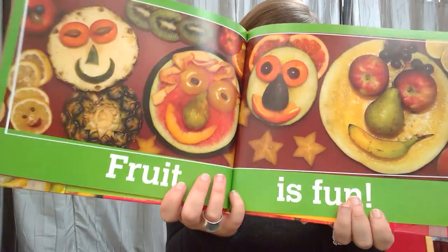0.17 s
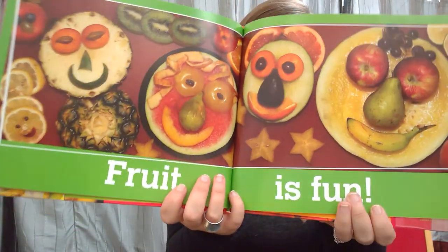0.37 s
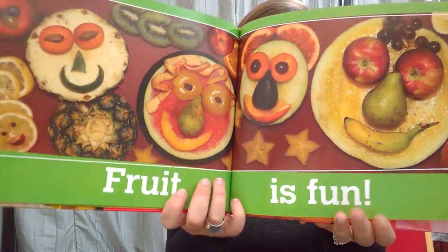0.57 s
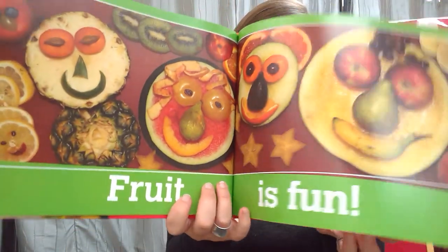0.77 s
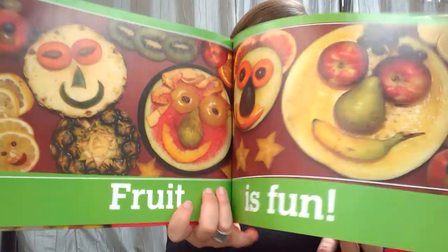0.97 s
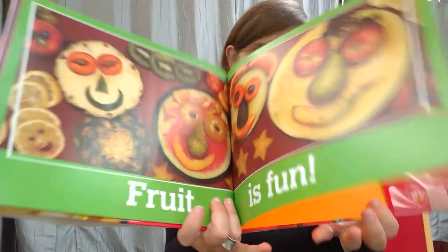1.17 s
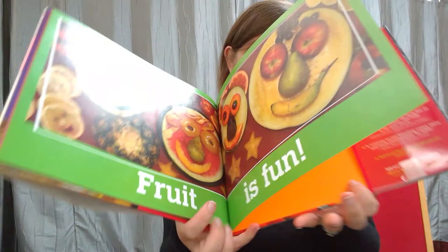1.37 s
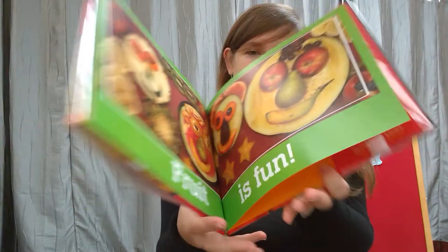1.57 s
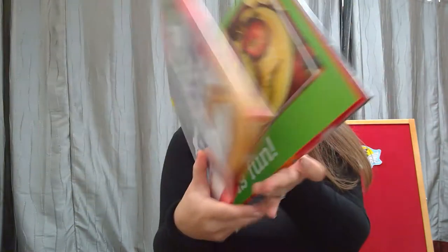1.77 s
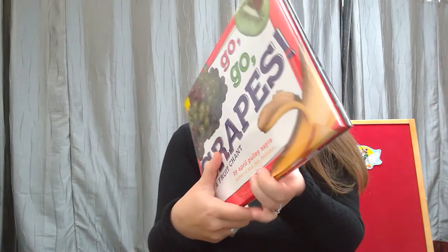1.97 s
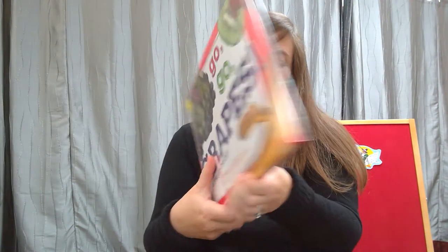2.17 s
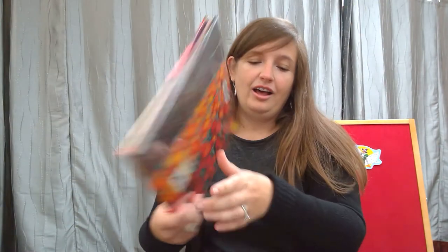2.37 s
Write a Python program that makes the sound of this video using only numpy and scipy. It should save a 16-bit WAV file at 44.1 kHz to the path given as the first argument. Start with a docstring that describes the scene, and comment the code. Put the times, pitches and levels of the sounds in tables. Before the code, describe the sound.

Hands shift and close a big stiff-covered book, with dull knocks and brief paper slides giving way to sharp, light clicks and crinkles, close and slightly left, over faint low room rumble and hum.

```python
"""In a small quiet room, a large hardcover picture book is held open, folded shut and turned over close by.
Fingers tap and slide on the boards, and the spine and glossy jacket snap and crackle: short bursts and
rushes of noise make the cover ring. Soft knocks are fading tones with a dull scuff.
A palm drags with a thin, sinking whistle, and the pages flap low: both are shaped noise.
Under it lie a low room rumble of noise and a faint steady hum; near echoes and a short tail add the room."""
import sys
import numpy as np
from scipy import signal
from scipy.fft import rfft, irfft
from scipy.io import wavfile
from scipy.ndimage import uniform_filter1d

SR = 44100
rng = np.random.default_rng(int(sys.argv[2]) if len(sys.argv) > 2 else 0)


def transcribe(signal):
    """Save signal, clipped to [-1, 1], as a 16-bit WAV file at the path in sys.argv[1]."""
    frames = np.atleast_2d(signal).T
    limited = np.clip(frames, -1, 1)
    pcm = np.round(limited * 32767).astype(np.int16)
    wavfile.write(sys.argv[1], SR, pcm)


N = 106501  # length in samples

# In all tables, t60_s is the time a sound takes to fade by 60 dB.
# Room rumble, tone balance: pitch_hz, relative_level_db (per Hz)
RUMBLE_SPECTRUM = [(25, -5), (37, 8), (47, -12), (58, -9.5), (80, -22.5), (170, -33.5), (500, -36),
                   (1200, -43), (3000, -57), (6000, -54), (16000, -65)]
# Steady hum: pitch_hz, level_db
HUM_TONES = [(120.5, -71)]
# Fading tail of the room: pitch_hz, t60_s, level_db
ROOM_TAIL = [(149, 0.086, -7.5), (463, 0.42, -4.5), (1110, 0.21, -9.5), (2780, 0.17, -13),
             (6550, 0.33, -13), (17700, 0.31, -23.5)]
# Echoes from nearby surfaces: delay_s (varied by up to a tenth), level_db
NEAR_ECHOES = [(.0031, -17), (0.0116, -16)]
# Loudness of the flapping pages as the book moves: time_s, level_db
FLAP_LEVEL = [(0, -50.5), (.35, -69.5), (.46, -58), (.7, -45), (.88, -55.5), (1.0, -46), (1.1, -56),
              (1.28, -59), (1.37, -52), (1.55, -60), (2.0, -58), (2.15, -60.5), (2.41, -63.5)]
# Flapping pages, tone balance: pitch_hz, relative_level_db (per Hz)
FLAP_SPECTRUM = [(15, -17.5), (35, 9.5), (70, 1.5), (130, -12.5), (300, -12), (600, -17.5), (1200, -30),
                 (4000, -54.5)]
# Loudness of the fine crackle as the jacket flexes: time_s, level_db
CRACKLE_LEVEL = [(.4, -82), (.7, -86), (.87, -70), (1.27, -77), (1.36, -53), (1.55, -65), (1.7, -58.5),
                 (1.85, -64), (2.02, -55), (2.16, -75), (2.26, -56), (2.41, -53)]
# Fine crackle, tone balance: pitch_hz, relative_level_db (per Hz)
CRACKLE_SPECTRUM = [(100, -54), (500, -1), (1000, -7.5), (1900, 14.5), (4000, 5.5), (8000, -17.5),
                    (16000, -11)]
# Ringing of the cover, before each contact shifts its pitch: pitch_hz, level_db, t60_s
COVER_MODES = [(968, -27.5, 0.024), (1870, -27, 0.0072), (2246, -25, 0.019), (3260, -11, 0.0039),
               (4240, -24.5, 0.02)]
# Board, crack, snap and fizz bands, one per row: low_hz, high_hz
BAND_EDGES = [(500, 1400), (1400, 2800), (2800, 6000), (6000, 16000)]
# The same four bands: click_decay_s, left_right_likeness (0 to 1), right_channel_db (against the left)
BAND_CHARACTER = [(0.0034, 0.66, -4), (0.0023, 0, -13), (0.00079, 0.56, -7.5), (0.0018, 0, -12)]
# Soft blows on the boards, pitched by the grip: start_s, pitch_hz, level_db, t60_s
BOARD_KNOCKS = [(0.4287, 347, -30, 0.027), (.9345, 825, -29, 0.016), (.9565, 724, -34.5, 0.043),
                (0.977, 745, -34, 0.06), (1.1, 658, -49, 0.059), (1.3443, 166, -30, 0.058),
                (1.3499, 245, -32.5, 0.036), (1.4048, 420, -30.5, 0.026), (1.6409, 819, -38, 0.1),
                (1.766, 350, -37, 0.046), (1.965, 282, -39, 0.062), (1.989, 167, -42.5, 0.089),
                (2.302, 385, -38, 0.044)]
# Short rushes of noise, from skin and paper sliding and from the fading tails of snaps:
# start_s, length_s, board_db, crack_db, snap_db, fizz_db
RUSHES = [(0, 0.021, -50, -51, -46.5, -51.5), (0.275, 0.053, -74, -64, -102, -83),
          (0.421, 0.024, -42, -54, -69.5, -58.5), (0.651, 0.096, -54.5, -66, -81, -97),
          (0.681, 0.046, -55, -54.5, -61, -62), (0.93, 0.028, -44, -44.5, -56, -54),
          (0.959, 0.026, -46, -51.5, -58.5, -60), (1.324, 0.071, -54.5, -54.5, -57.5, -51),
          (1.633, 0.011, -40, -51, -71, -44), (1.96, 0.051, -55.5, -50.5, -54, -59),
          (2.029, 0.053, -86, -53, -63.5, -59), (2.191, 0.078, -98, -92, -55, -54.5)]
# Snaps of spine, jacket and fingertips: time_s, board_db, crack_db, snap_db, fizz_db
SNAPS = [(0.0547, -37.5, -48, -87, -98), (0.073, -51, -50.5, -90, -93), (0.3509, -75, -63, -61.5, -91.5),
         (0.4312, -42.5, -42, -46.5, -83), (0.4332, -46, -52, -53, -90), (0.4498, -62, -50, -51, -77),
         (0.517, -56, -55.5, -65.5, -90), (0.544, -38, -45, -54, -89), (0.6127, -32.5, -32, -46, -39.5),
         (0.6381, -39, -45.5, -52.5, -58.5), (0.7191, -50.5, -75, -44.5, -61.5),
         (0.793, -77, -67, -62, -54), (0.8253, -63.5, -55.5, -67, -103), (0.9009, -47, -58, -78, -93),
         (0.9403, -45.5, -47.5, -49, -49), (0.9694, -45.5, -42, -54, -63.5), (0.9752, -46, -48, -45.5, -61),
         (0.9843, -53, -40, -51, -70), (1.0794, -63, -77, -57.5, -64.5), (1.137, -66, -55, -53, -80),
         (1.2019, -43.5, -48.5, -58, -87), (1.2111, -46.5, -49.5, -81, -82), (1.297, -66, -87, -60.5, -57),
         (1.337, -58, -48, -47, -49.5), (1.3474, -41.5, -44.5, -39.5, -38.5),
         (1.3539, -46, -67, -48.5, -43), (1.4028, -41, -65, -55, -50.5), (1.441, -42, -36, -34.5, -36),
         (1.5103, -64, -48.5, -51.5, -62.5), (1.561, -68, -49, -58, -57.5), (1.5716, -61, -61, -69, -51),
         (1.598, -70, -54.5, -58, -44), (1.6363, -61, -41.5, -48.5, -49),
         (1.6572, -72, -40.5, -51.5, -82.5), (1.6743, -51, -50, -44, -47), (1.748, -57, -43.5, -54, -64),
         (1.774, -57, -47.5, -44.5, -41), (1.795, -79, -51, -52, -52.5), (1.819, -75, -52, -56, -56),
         (1.874, -61.5, -46, -50, -76.5), (1.9066, -86, -36.5, -48, -45), (1.931, -78, -51, -70, -47.5),
         (1.9949, -41, -55, -39.5, -47.5), (1.998, -76, -34, -37, -37.5), (2.0372, -67, -51, -52, -87),
         (2.0539, -51.5, -63, -47, -54), (2.075, -54, -52, -45, -47.5), (2.1369, -79, -82, -51, -57.5),
         (2.1979, -72, -48.5, -34, -44.5), (2.3022, -86, -73, -49.5, -52.5),
         (2.3324, -64, -49, -56.5, -76.5), (2.3643, -61, -44.5, -44.5, -51.5)]

RUMBLE_DB, RUMBLE_LIKENESS = -57.5, 0.99
ROOM_RIGHT_DB, ROOM_ONSET_S = -2.5, 0.00067
ROOM_MONO_HZ = 1420  # the two sides of the tail grow less alike towards and above this pitch
FLAP_RIGHT_DB = -2.76
DRAG_START_S, DRAG_FROM_HZ, DRAG_TO_HZ, DRAG_WIDTH_HZ = 2.22, 2140, 1700, 170
DRAG_DB = -56  # before the stroke shapes it
CRACKLES_PER_S, CRACKLE_SPREAD_DB = 3500, 2.5
JACKET_RIGHT_DB = -8.5  # for the crackle and the drag
CLUMP_S, CLUMP_DB = 0.004, 4  # grains come in clumps
GRIP_DETUNE = 0.099  # share of pitch by which the hands shift the cover's modes
KNOCK_RISE_S, KNOCK_RIGHT_DB = 0.0025, -4.5
KNOCK_SCUFF = 0.45  # strength of the scuff (rms) beside a tone of peak 1
RUSH_ATTACK_S, RUSH_RELEASE_S, RUSH_TOP_HZ = 0.0075, 0.019, 9140
GRAINS_PER_S, GRAIN_SPREAD_DB = 920, 3.5
RUSH_SMOOTH = 0.46  # smooth hiss beside the grains
SHARP_RISE_S = 0.00016
SOFT_EXTRA_RISE_S, SOFT_RANGE_DB = 0.0011, 20  # dull fingertip taps build up more slowly than snaps
FIRST_SNAP = 0.57  # strength of the first impulse in a sharp snap
LEAD_IN_S, LEAD_IN_DB = 0.0035, -14.5  # the surfaces creep softly around the moment they let go, fading away before and after it
RIGHT_LAG_S = 0.00008
TOP_HZ = 15900


def amp(db):
    """Turns decibels into a multiplier."""
    return 10 ** (np.asarray(db) / 20)


def unit(x):
    """Scales a sound to an average (rms) strength of 1."""
    return x / np.sqrt(np.mean(x ** 2) + 1e-20)


def read(points, hz, axis=1):
    """Reads a table column between its points, with pitch spaced on a log scale."""
    table = np.transpose(points)
    return np.interp(np.log(hz + 1), np.log(table[0] + 1), table[axis])


def level(points):
    """Makes a multiplier that changes over time from (time_s, level_db) points."""
    return amp(np.interp(np.arange(N) / SR, *np.transpose(points)))


def add(mix, s, sound):
    """Mixes a stereo sound in at time s."""
    start = max(round(s * SR), 0)
    part = mix[:, start:][:, :sound.shape[1]]
    part += sound[:, :part.shape[1]]


def colour(x, points):
    """Gives a sound the listed tone balance without smearing it ahead in time; the result has rms 1."""
    log_gain = np.log(amp(read(points, abs(np.fft.fftfreq(N, 1 / SR)))))
    # the Hilbert transform supplies the phase that keeps the filter from acting early
    response = np.exp(np.conj(signal.hilbert(log_gain)))[:N // 2 + 1]
    return unit(irfft(rfft(x) * response, N))


def pair(a, b, likeness):
    """Blends two unrelated sounds into two channels that are alike by a chosen amount."""
    c = np.clip(likeness, 0, 1)
    right = c * unit(a) + np.sqrt(1 - c * c) * unit(b)
    return np.array([unit(a), unit(right)])


def background():
    """The room's low rumble is shaped noise; its faint hum is a steady tone."""
    t = np.arange(N) / SR
    hum = sum(amp(db) * np.sqrt(2) * np.sin(2 * np.pi * (hz * t + rng.random())) for hz, db in HUM_TONES)
    rumble = pair(*colour(rng.standard_normal((2, N)), RUMBLE_SPECTRUM), RUMBLE_LIKENESS)
    return amp(RUMBLE_DB) * rumble + hum


def room(x):
    """Nearby surfaces give a few echoes, then many blended reflections make a short tail."""
    t = np.arange(SR // 2) / SR
    hz, at, z = signal.stft(rng.standard_normal((2, len(t))), SR, nperseg=256)
    alike = 1 / (1 + (hz[:, None] / ROOM_MONO_HZ) ** 2)
    z = np.array([z[0], alike * z[0] + np.sqrt(1 - alike ** 2) * z[1]])
    t60 = read(ROOM_TAIL, hz)[:, None]
    gain = amp(read(ROOM_TAIL, hz, axis=2))[:, None]
    even_energy = np.sqrt(2 * np.log(1000) / (t60 * SR))  # so a longer fade is not a stronger tail
    z = z * gain * even_energy * np.exp(-np.log(1000) * at / t60)
    tail = signal.istft(z, SR, nperseg=256)[1][:, :len(t)]
    tail = tail * np.minimum(t / ROOM_ONSET_S, 1)
    for delay_s, db in NEAR_ECHOES:
        places = (delay_s * SR * rng.uniform(.9, 1.1, 2)).astype(int)
        tail[[0, 1], places] += amp(db)
    # the left channel alone feeds the room
    return signal.fftconvolve(x[:1], tail, axes=1)[:, :N] * amp([[0], [ROOM_RIGHT_DB]])


def flap():
    """The wide pages push air as they sway, heard as low noise that rises and falls."""
    noise = colour(rng.standard_normal((2, N)), FLAP_SPECTRUM)
    return pair(*noise, 0.81) * level(FLAP_LEVEL) * amp([[0], [FLAP_RIGHT_DB]])


def drag():
    """A palm slides on the jacket: friction noise in a narrow band that sinks as the stroke grows."""
    t = np.arange(N) / SR
    stroke = np.clip((t - DRAG_START_S) / (N / SR - DRAG_START_S), 0, 1)
    pitch_hz = DRAG_FROM_HZ + (DRAG_TO_HZ - DRAG_FROM_HZ) * stroke
    turn = np.exp(2j * np.pi * np.cumsum(pitch_hz) / SR)
    # shift noise down, keep a narrow band, then shift it back up to the moving pitch
    low_pass = signal.butter(2, DRAG_WIDTH_HZ / 2, fs=SR, output="sos")
    narrow = signal.sosfilt(low_pass, rng.standard_normal((2, N)) / turn)
    whistle = pair(*(narrow * turn).real, 0.35)
    return amp(DRAG_DB) * whistle * np.sqrt(stroke) * amp([[0], [JACKET_RIGHT_DB]])


def grains(size, per_s, spread_db):
    """Scatters random impulses of uneven strength."""
    strength = amp(spread_db * np.minimum(rng.exponential(1, size), 4))
    return strength * rng.choice([-1, 1], size) * (rng.random(size) < per_s / SR)


def clumps(size):
    """Makes an uneven strength that swells and dips at random, so grains seem to bunch."""
    wander = uniform_filter1d(rng.standard_normal(size), max(round(CLUMP_S * SR), 2))
    return amp(CLUMP_DB * unit(wander))


def crackle():
    """Small creases of the jacket let go as tiny random ticks while the book is handled."""
    ticks = grains((2, N), CRACKLES_PER_S, CRACKLE_SPREAD_DB) * clumps(N)
    ticks = colour(ticks, CRACKLE_SPECTRUM)
    return pair(*ticks, 0.2) * level(CRACKLE_LEVEL) * amp([[0], [JACKET_RIGHT_DB]])


def knock(hz, db, t60):
    """A soft blow swings one bending mode of a board, with a dull scuff."""
    t = np.arange(SR // 8) / SR
    around_pitch = signal.butter(2, [hz / 2, hz * np.sqrt(2)], "band", fs=SR, output="sos")
    scuff = unit(signal.sosfilt(around_pitch, rng.standard_normal(len(t))))
    swing = np.sin(2 * np.pi * hz * t) + KNOCK_SCUFF * scuff
    rise = np.sin(np.pi / 2 * np.minimum(t / KNOCK_RISE_S, 1)) ** 2
    return swing * rise * amp(db - 60 * t / t60) * amp([[0], [KNOCK_RIGHT_DB]])


def grip():
    """The hands shift the cover's modes by new pitch factors at each contact."""
    return 1 + GRIP_DETUNE * rng.uniform(-1.08, 1, len(COVER_MODES))


def through_cover(drive, band, likeness, right_db, detune):
    """Two drives make the cover ring, heard in one band; the left channel has rms 1."""
    t = np.arange(drive.shape[1]) / SR
    ring = (t == 0).astype(float)  # the drive itself, before the ringing
    for (hz, db, t60), shift in zip(COVER_MODES, detune):
        ring += amp(db - 60 * t / t60) * np.cos(2 * np.pi * hz * shift * t)
    rung = signal.fftconvolve(drive, ring[None], axes=1)[:, :len(t)]
    band_pass = signal.butter(4, band, "band", fs=SR, output="sos")
    left, right = pair(*signal.sosfilt(band_pass, rung), likeness)
    return np.array([left, amp(right_db) * right])


def rush(length, levels_db):
    """A short rush of noise, a slide or a snap's fading tail: dense tiny grains and hiss drive the cover."""
    t, out, detune = np.arange(SR // 4) / SR, 0, grip()
    drive = unit(grains((2, len(t)), GRAINS_PER_S, GRAIN_SPREAD_DB))
    drive = drive + RUSH_SMOOTH * rng.standard_normal((2, len(t)))
    drive = drive * clumps(len(t))
    release = np.exp(-np.maximum(t - length + RUSH_RELEASE_S, 0) / RUSH_RELEASE_S)
    swell = np.minimum(t / RUSH_ATTACK_S, 1) * release
    for band, db, (_, likeness, right_db) in zip(BAND_EDGES, levels_db, BAND_CHARACTER):
        out = out + amp(db) * through_cover(drive, band, likeness, right_db, detune)
    return signal.sosfilt(signal.butter(4, RUSH_TOP_HZ, fs=SR, output="sos"), out * swell)


def click(s, levels_db):
    """Surfaces creep a little, let go and chatter for a few milliseconds, making the cover ring."""
    t, out = np.arange(-441, 1764) / SR, 0  # from 10 ms before the release to 40 ms after
    noise, detune = rng.standard_normal((2, len(t))), grip()
    # much more board than fizz means a dull, soft tap
    soft = np.clip((levels_db[0] - levels_db[3]) / SOFT_RANGE_DB - .5, 0, 1)
    rise_s = SHARP_RISE_S + soft * SOFT_EXTRA_RISE_S
    creep = amp(LEAD_IN_DB) * np.exp(-abs(t) / LEAD_IN_S)
    rise = np.clip(t / rise_s, 0, 1) ** 2
    for band, db, (decay_s, likeness, right_db) in zip(BAND_EDGES, levels_db, BAND_CHARACTER):
        chatter = rise * np.exp(-np.maximum(t - rise_s, 0) / decay_s)
        drive = noise * (creep + chatter)
        drive[0, np.searchsorted(t, rise_s)] -= FIRST_SNAP * (1 - soft) * np.linalg.norm(drive[0])
        # spread over 50 ms here, while the listed levels are rms over 5 ms
        gain = amp(db) / np.sqrt(10)
        out = out + gain * through_cover(drive, band, likeness, right_db, detune)
    return s + t[0], out


def scene():
    """The book sounds a little to the left in its room, as the right side is softer and slightly later."""
    book = crackle() + drag()
    for s, *levels_db in SNAPS:
        add(book, *click(s, levels_db))
    for s, length, *levels_db in RUSHES:
        add(book, s, rush(length, levels_db))
    for s, hz, db, t60 in BOARD_KNOCKS:
        add(book, s, knock(hz, db, t60))
    left, right = book + room(book) + flap() + background()
    return np.array([left, np.roll(right, round(RIGHT_LAG_S * SR))])


def record(dry):
    """A steep low-pass filter takes away the very highest treble."""
    low_pass = signal.firwin(401, TOP_HZ, window=("kaiser", 9), fs=SR)
    return signal.oaconvolve(dry, low_pass[None], "same")


dry = scene()
out = record(dry)
transcribe(out)
```